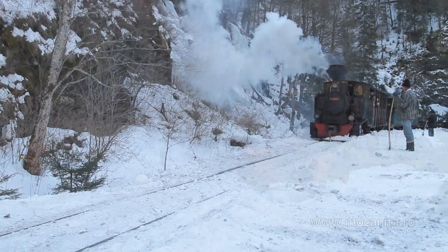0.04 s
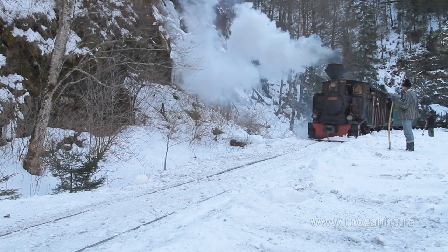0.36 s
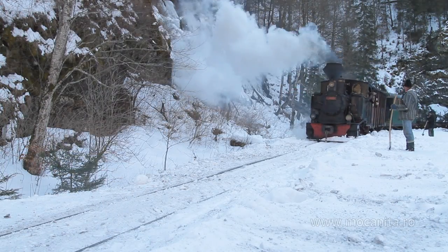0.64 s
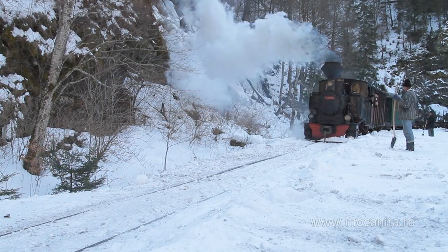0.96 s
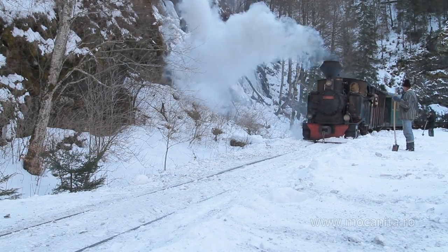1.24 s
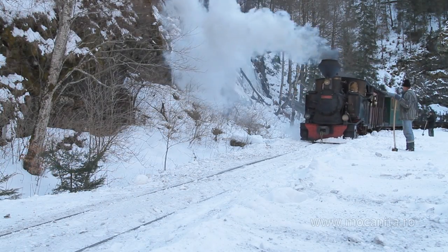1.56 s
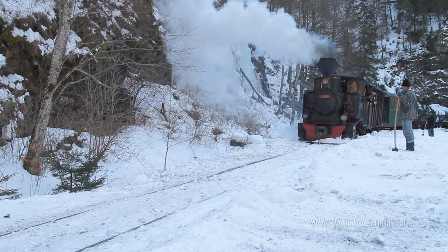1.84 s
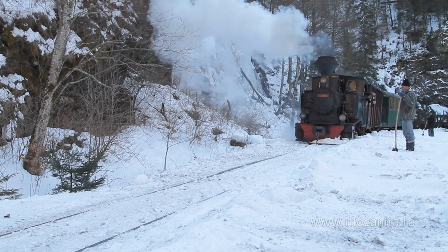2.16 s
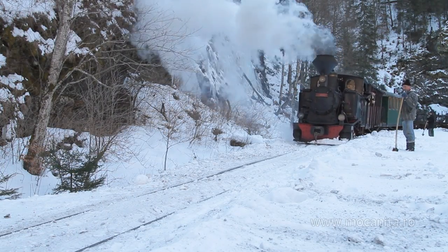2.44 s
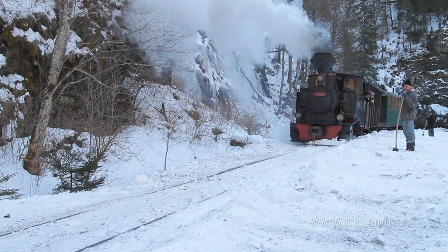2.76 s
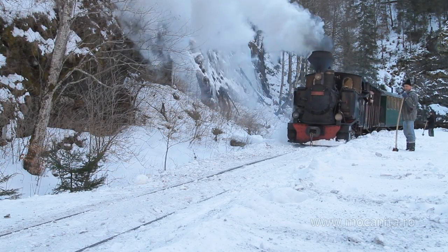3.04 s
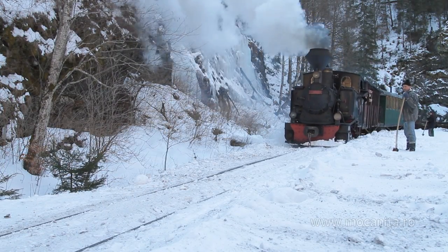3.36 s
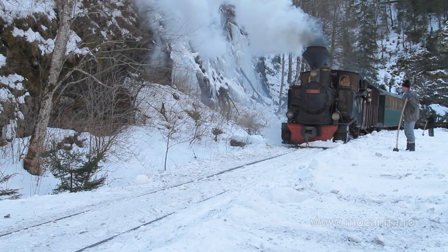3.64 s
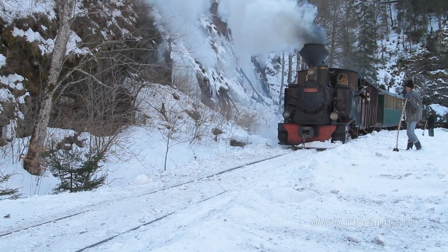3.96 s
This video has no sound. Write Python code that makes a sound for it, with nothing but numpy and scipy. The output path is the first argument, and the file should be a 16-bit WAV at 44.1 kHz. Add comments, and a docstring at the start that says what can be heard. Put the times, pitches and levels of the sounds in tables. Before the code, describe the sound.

A steam engine pulls toward the microphone, chuffing in alternating strong and weak beats that speed up and echo off trees. Low gusts of wind thump the microphone early and fade, while a steady steam hiss grows.

```python
"""Wind buffets a stereo microphone in a snowy forest, then dies down. Through it a narrow-gauge steam
locomotive pulls towards the microphone, gathering speed. Each exhaust beat, strong and weak in turn,
opens with a hollow bark and roars through the ringing chimney with a hiss of steam, and the trees
scatter it back. Steam leaks between the beats, louder as the engine draws nearer."""
import sys
import numpy as np
from scipy import signal
from scipy.fft import rfft, irfft
from scipy.io import wavfile
from scipy.ndimage import uniform_filter1d

SR = 44100
rng = np.random.default_rng(int(sys.argv[2]) if len(sys.argv) > 2 else 0)


def materialize(psi):
    """Save the field psi as 16-bit PCM at rate SR to the path in sys.argv[1].

    A 1-D psi becomes a single channel; in a 2-D psi each row is a channel.
    """
    bounded = np.clip(np.atleast_2d(psi).T, -1, 1)
    quanta = np.round(bounded * 32767).astype(np.int16)
    wavfile.write(sys.argv[1], SR, quanta)


N = 176400
T, HZ = np.arange(N) / SR, np.fft.rfftfreq(N, 1 / SR)

# spectra of the breeze and of a buffet on the microphone: f/Hz, level/dB
WIND_SPECTRUM = [(8, -42), (25, 6), (50, 1.5), (90, -6), (130, -10.5), (180, -19), (260, -23), (500, -33),
                 (1500, -38), (6000, -91)]
BUFFET_SPECTRUM = [(10, -6), (35, -0.5), (70, 3.5), (115, 2), (170, -8.5), (240, -16), (400, -30.5),
                   (1500, -56), (6000, -95)]
# the breeze dying down: t/s, level/dB
WIND_LEVEL = [(0, -22.5), (.3, -21.5), (.52, -16.5), (.65, -29.5), (.78, -31), (.86, -17.5), (1.02, -29),
              (1.15, -16), (1.36, -19), (1.55, -25.5), (1.75, -22), (1.92, -21), (2.1, -28), (2.5, -27.5),
              (2.65, -33), (3.35, -27), (3.55, -42), (4, -41)]
# single buffets: t/s, width/s, level/dB, right minus left/dB
BUFFETS = [(0.053, 0.0099, -25, -15), (0.178, 0.037, -12, 3.5), (0.421, 0.033, -4, 2.5),
           (0.863, 0.017, -21.5, 0), (1.153, 0.014, -18, 13), (1.236, 0.014, -10, 1.5),
           (1.648, 0.01, -13.5, 0), (1.73, 0.016, -18, 3), (1.83, 0.017, -16, 2.5), (1.911, 0.013, -16, 4),
           (2.158, .012, -21, 0), (3.249, 0.0042, -27, -15)]
# the microphone's own hiss: f/Hz, level/dB
MIC_HISS_SPECTRUM = [(100, -2), (4000, -5), (11000, 6.5), (15500, 0)]
# leaking steam: f/Hz, level/dB
LEAK_SPECTRUM = [(30, -35), (85, 6), (120, 1.5), (190, -7), (400, 3), (900, -1.5), (1500, -7), (3500, -8),
                 (6000, -13), (9000, -22), (13000, -25.5), (15700, -22)]
# the leak drawing nearer: t/s, level/dB
LEAK_LEVEL = [(0, -40), (.7, -40.5), (1.4, -42), (2.1, -37), (3, -30.5), (4, -31.5)]
# exhaust beats: t/s, rise/s, hold/s, then relative level/dB of roar, hiss, fizz and bark
BEATS = [(0.155, 0.062, 0.021, -22.5, -25.5, -41, -19), (0.476, 0.051, 0.033, -26.5, -35, -51, -25),
         (0.802, 0.056, 0.05, -22, -27, -43, -12.5), (1.113, 0.048, 0.015, -18.5, -25.5, -45, -19),
         (1.404, .05, 0.013, -16, -22.5, -37, -15.5), (1.65, 0.051, 0.091, -23, -32, -51, -22.5),
         (1.916, 0.054, 0.025, -16, -21.5, -33, -14), (2.172, 0.051, 0.064, -19, -26.5, -42, -23.5),
         (2.431, 0.046, 0.021, -14.5, -20.5, -33, -19.5), (2.635, 0.061, 0.082, -19, -26.5, -41.5, -23),
         (2.895, 0.048, 0.021, -15, -19.5, -32.5, -16), (3.117, 0.047, 0.047, -18.5, -24.5, -38, -19),
         (3.328, .042, 0.034, -15.5, -21.5, -41, -17), (3.538, 0.051, 0.074, -19, -25.5, -37, -27),
         (3.763, 0.051, 0.052, -16.5, -21, -33.5, -14)]
# spectra of those four parts: f/Hz, level/dB
ROAR_SPECTRUM = [(30, -27), (120, -7.5), (220, -13.5), (290, -2), (400, 6), (700, -8), (930, -11),
                 (1100, -15.5), (1400, -7), (2200, -18.5), (5000, -33)]
HISS_SPECTRUM = [(500, -20.5), (1200, -6.5), (1600, -0.5), (2150, 0), (2600, -1.5), (3000, -1), (3500, -3),
                 (4200, -2), (4900, -6), (6000, -10.5), (8000, -18.5), (12000, -38)]
FIZZ_SPECTRUM = [(2500, 3), (5000, -3.5), (6600, 5.5), (8000, 3), (9000, 2.5), (10500, -2), (12500, -37.5),
                 (14300, -82), (15700, -59)]
BARK_SPECTRUM = [(200, -31), (400, -5), (520, -5), (615, 11.5), (700, -7), (800, -0.5), (930, -13.5),
                 (1030, 6), (1200, -0.5), (1330, -8), (1580, -12), (2000, -34), (5000, -45)]
# chimney and smokebox resonances: f/Hz, width/Hz, relative level/dB midway, growth on approach/(dB/s)
RESONANCES = [(336.9, 17.3, -9, 1), (405.5, 21.6, -4.5, 1.1), (487, 40, -16.5, 0), (530, 71, -15.5, 1.9),
              (635.5, 40, -9, -0.04), (704, 66, -32, 7.9), (777, 90, -10, 1.5), (1038, 45, -10, 0.9),
              (1160, 25, -14, -1), (1192, 44, -9.5, 0), (1554, 44, -21, -5.8), (1857, 84, -16, 1.7),
              (2426, 180, -15.5, 0.2), (3270, 45, -24.5, 7)]
# reflections off ground, boiler and bank: delay/s, gain
REFLECTIONS = [(.0047, .1), (.0113, .13), (0.02, .12)]
# decay of the forest echo: f/Hz, t60/s
FOREST_T60 = [(200, 0.87), (500, 0.61), (1500, 0.52), (4000, 0.38), (12000, 0.39)]
# likeness of the two microphone ports: f/Hz, likeness (capped at 1)
PORT_LIKENESS = [(100, 0.7), (350, 1), (1000, 0.9), (2500, 2), (4500, 0.15), (7500, 0.74), (10200, 0.46),
                 (11500, 1.36), (13500, 2.1), (15500, .8)]
# phase between the ports: f/Hz, lead of the left/rad
PORT_LEAD = [(200, .02), (1000, 0.51), (2800, 0.87), (3800, 0.85), (4700, 0.61), (5400, 1.9), (6400, 1.58),
             (7200, 2.6), (8000, 1.24), (8800, 2.04), (10200, 2), (11000, 3.06), (15500, 3.4)]
# balance of the ports: f/Hz, left minus right/dB
PORT_BALANCE = [(200, -1.5), (400, -4), (1000, -1.1), (2500, -1), (4800, -1.5), (6700, -1), (7700, 4),
                (8600, 0), (11000, -0.5)]


def amp(db):
    """Decibels to gain."""
    return 10 ** (np.asarray(db) / 20)


def unit_rms(x):
    """Scales to rms 1."""
    return x / np.sqrt(np.mean(x ** 2) + 1e-20)


def curve(points, hz=HZ):
    """Reads a table along log frequency."""
    f, value = np.transpose(points)
    return np.interp(np.log(hz + 1), np.log(f + 1), value)


def fader(points):
    """Gain over time from points of t/s, level/dB."""
    return amp(np.interp(T, *np.transpose(points)))


def noise(spectrum):
    """Two unrelated noises with the given spectrum, at rms 1."""
    return unit_rms(irfft(rfft(rng.standard_normal((2, N))) * amp(curve(spectrum)), N))


def steadied(x, samples):
    """Takes the slow chance swells out of a noise."""
    return x / np.sqrt(abs(uniform_filter1d(x ** 2, samples, axis=-1)) + 1e-12)


def eddies(spectrum, likeness=0.057):
    """Turbulence right at the microphone, barely shared by its two ports."""
    left, other = noise(spectrum)
    right = likeness * left + np.sqrt(1 - likeness ** 2) * other
    return steadied(np.array([left, right]), samples=1800)


def wind(right_bias_db=3.5):
    """A dying breeze rumbles on the microphone, with a few hard buffets."""
    sides = np.array([[-.5], [.5]])
    breeze = eddies(WIND_SPECTRUM) * fader(WIND_LEVEL) * amp(sides * right_bias_db)
    buffet_power = sum(amp(db + sides * pan_db) ** 2 * np.exp(-((T - at) / width) ** 2)
                       for at, width, db, pan_db in BUFFETS)
    return breeze + eddies(BUFFET_SPECTRUM) * np.sqrt(buffet_power)


def mic_hiss():
    """The microphone's own faint, steady noise."""
    return amp(-55) * noise(MIC_HISS_SPECTRUM)


def steam_leak():
    """Steam escapes all the while, louder as the distance closes."""
    return fader(LEAK_LEVEL) * noise(LEAK_SPECTRUM)


def steam_flow(part, lag_s, swell_db, fall_db_per_s, flutter_db, hold_share=1):
    """One part of every beat: the valve opens, holds, and the cylinder empties with turbulent flutter."""
    column = ("roar", "hiss", "fizz", "bark").index(part)
    clock = T[::16]
    power = np.zeros(len(clock))
    for start, rise, hold, *levels_db in BEATS:
        since_open = clock - start - lag_s - rise
        opening_db = swell_db * np.minimum(since_open / rise, 0) ** 2
        emptying_db = fall_db_per_s * np.maximum(since_open - hold * hold_share, 0)
        power += amp(levels_db[column] - opening_db - emptying_db) ** 2
    flutter = unit_rms(uniform_filter1d(rng.standard_normal(N), size=220))
    return np.interp(T, clock, np.sqrt(power)) * amp(flutter_db * flutter)


def chimney(roar_db=-8, ring_db=-2, midway_s=2):
    """Each blast roars out of the stack and rings its resonances."""
    flow = steam_flow("roar", lag_s=0.00082, swell_db=18.3, fall_db_per_s=167, flutter_db=0.97)
    out = amp(roar_db) * flow * noise(ROAR_SPECTRUM)
    for hz, width, db, growth in RESONANCES:
        band = 1 / (1 + ((HZ - hz) / (0.77 * width)) ** 2)
        ring = irfft(rfft(rng.standard_normal((2, N))) * band, N)
        ring = unit_rms(steadied(ring, samples=4000))
        pole = np.exp(-np.pi * width / SR)  # narrow resonances ring on longer
        envelope = signal.lfilter([1 - pole], [1, -pole], flow)
        out += ring * envelope * amp(ring_db + db + growth * (T - midway_s))
    return out


def bark(gain_db=-3.5):
    """The short, hollow crack as the valve opens, clearest on the strong beats."""
    flow = steam_flow("bark", lag_s=0.0025, swell_db=29.5, fall_db_per_s=230, flutter_db=1.37,
                      hold_share=0.13)
    return amp(gain_db) * flow * noise(BARK_SPECTRUM)


def shifting_colour(x, depth_db=2.34):
    """The jet's colour drifts in patches a few hundred Hz wide and some 70 ms long."""
    spectra = signal.stft(x, nperseg=512)[2]
    patches = uniform_filter1d(rng.standard_normal(spectra.shape[1:]), size=4, axis=0)
    patches = unit_rms(uniform_filter1d(patches, size=12, axis=1))
    return unit_rms(signal.istft(spectra * amp(depth_db * patches), nperseg=512)[1][:, :N])


def steam_jet(hiss_db=-2, fizz_db=-1):
    """The hiss and fine fizz of the jet, combed by surfaces near the engine."""
    hiss_flow = steam_flow("hiss", lag_s=0.0094, swell_db=21.8, fall_db_per_s=132, flutter_db=1.05)
    hiss = amp(hiss_db) * hiss_flow * shifting_colour(noise(HISS_SPECTRUM))
    fizz_flow = steam_flow("fizz", lag_s=0.0067, swell_db=45, fall_db_per_s=235, flutter_db=1.5)
    direct = hiss + amp(fizz_db) * fizz_flow * noise(FIZZ_SPECTRUM)
    return direct + sum(gain * np.pad(direct, ((0, 0), (int(delay * SR), 0)))[:, :N]
                        for delay, gain in REFLECTIONS)


def forest_echo(x, gain_db=-10.5, build_s=0.034, paths=4):
    """Trunks scatter the sound back by paths that change as the engine moves; the treble dies first."""
    hz, t, spectra = signal.stft(rng.standard_normal((paths, 2, 2 ** 15)), SR, nperseg=256)
    decay = amp(-60 * t / curve(FOREST_T60, hz)[:, None])
    build = np.minimum(t / build_s, 1) ** 2
    tails = signal.istft(spectra * decay * build, SR, nperseg=256)[1]
    path = np.searchsorted([beat[0] for beat in BEATS], T) % paths  # each beat takes the next path
    echo = sum(signal.fftconvolve(x * (path == k), tail / np.linalg.norm(tail[0]), axes=1)
               for k, tail in enumerate(tails))
    return amp(gain_db) * echo[:, :N]


def mic_ports(x):
    """Two closely spaced ports pick up the train with a small delay and differing colour."""
    right, other = rfft(x)
    likeness = np.clip(curve(PORT_LIKENESS), 0, 1)
    left = likeness * right + np.sqrt(1 - likeness ** 2) * other
    left *= np.exp(1j * curve(PORT_LEAD))
    tilt = amp(curve(PORT_BALANCE) / 2)
    return irfft(np.array([left * tilt, right / tilt]), N)


def scene():
    """Exhaust, echo and leaking steam out among the trees; wind and faint hiss at the microphone."""
    exhaust = chimney() + bark() + steam_jet()
    train = mic_ports(exhaust + forest_echo(exhaust) + steam_leak())
    return train + wind() + mic_hiss()


def record(dry, threshold_db=-6, ratio=2, detector_fall_db_per_s=73, edge_hz=15700):
    """A compressor ducks the hardest buffets, peaks clip, and the top treble is cut off."""
    power = abs(uniform_filter1d(dry ** 2, 400, axis=1)).max(0)  # the louder channel rules
    fall_db = T * detector_fall_db_per_s
    held_db = np.maximum.accumulate(10 * np.log10(power + 1e-12) + fall_db) - fall_db
    over_db = np.maximum(held_db - threshold_db, 0)
    duck_db = (1 - 1 / ratio) * uniform_filter1d(over_db, size=200)
    clipped = np.clip(dry / amp(duck_db), -1, 1)
    lowpass = signal.firwin(511, edge_hz, window=("kaiser", 9), fs=SR)
    return signal.oaconvolve(clipped, lowpass[None], "same")


dry = scene()
out = record(dry)
materialize(out)
```